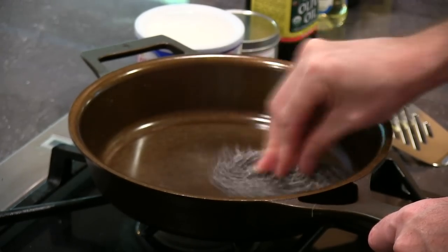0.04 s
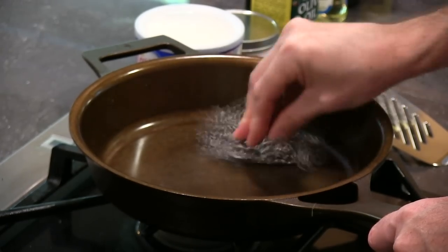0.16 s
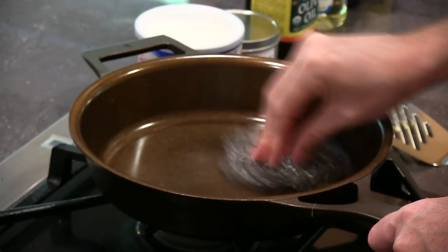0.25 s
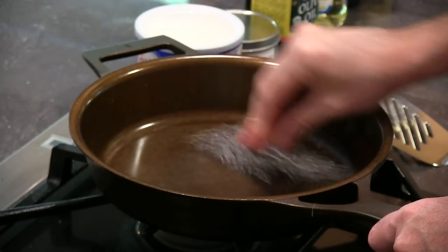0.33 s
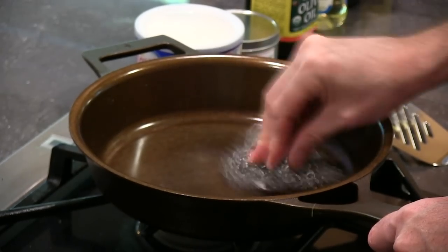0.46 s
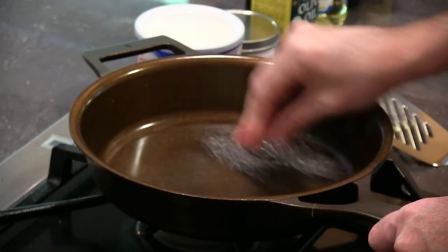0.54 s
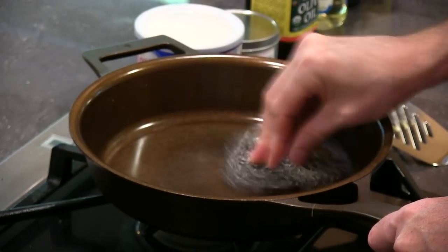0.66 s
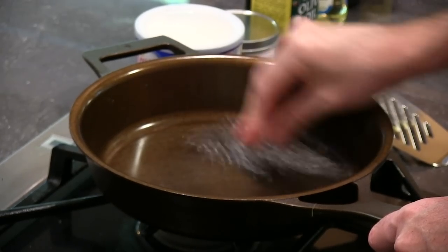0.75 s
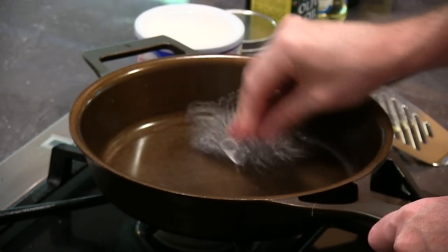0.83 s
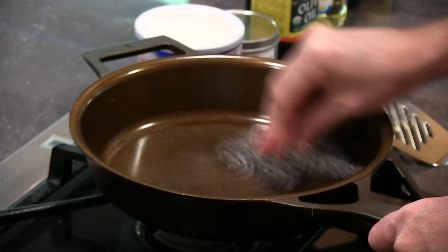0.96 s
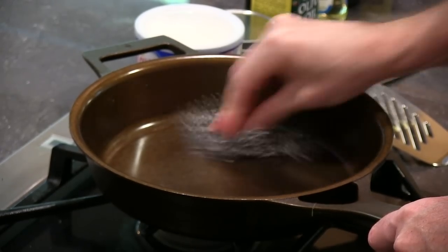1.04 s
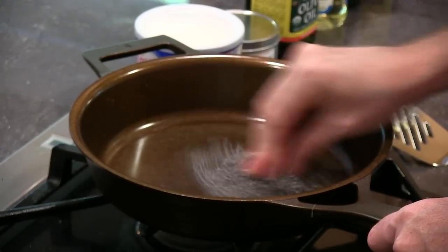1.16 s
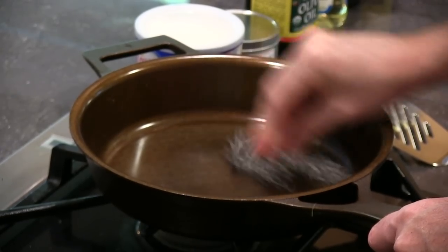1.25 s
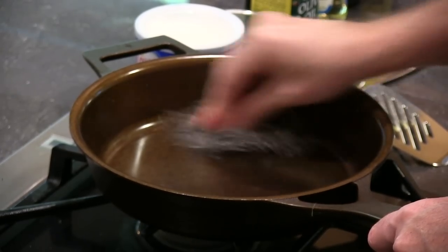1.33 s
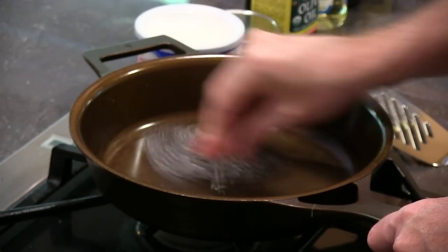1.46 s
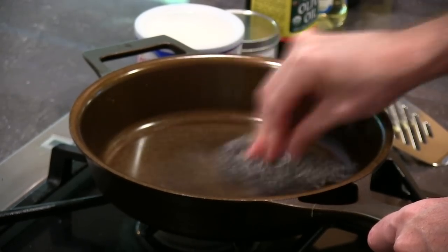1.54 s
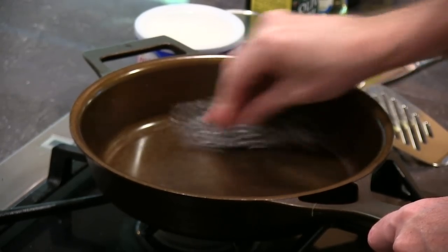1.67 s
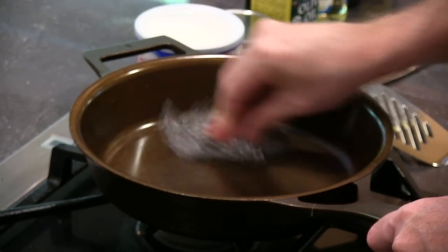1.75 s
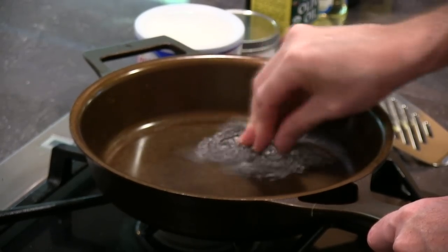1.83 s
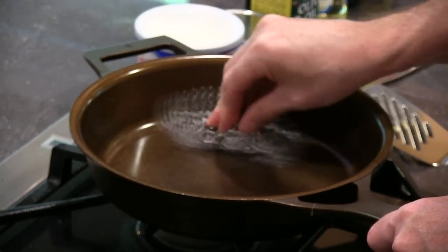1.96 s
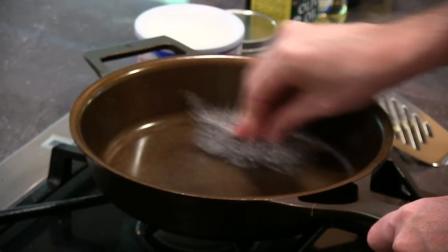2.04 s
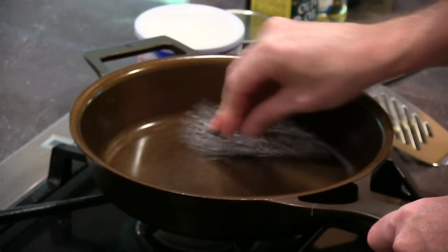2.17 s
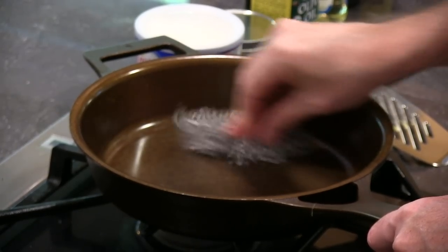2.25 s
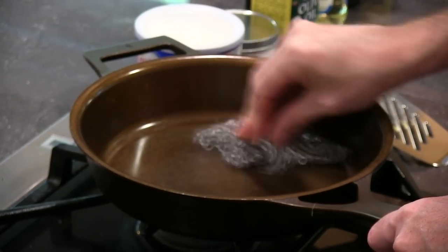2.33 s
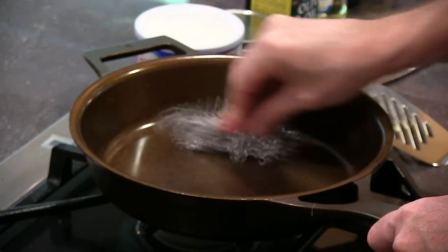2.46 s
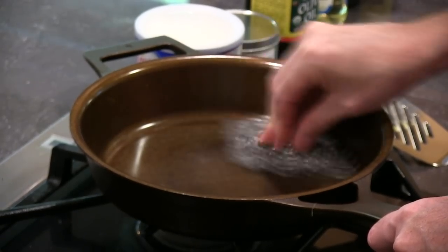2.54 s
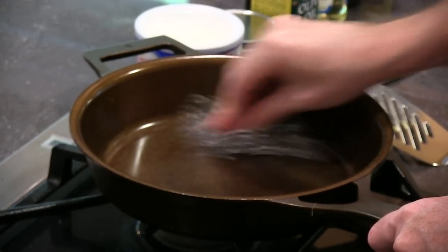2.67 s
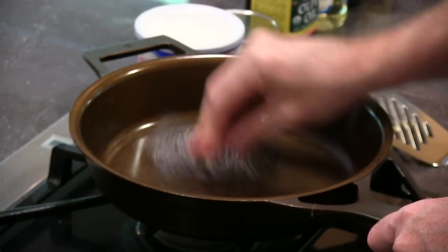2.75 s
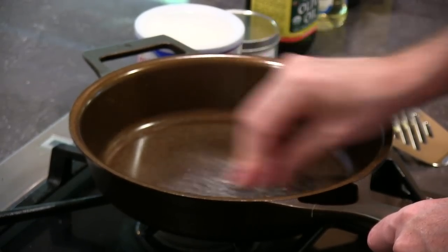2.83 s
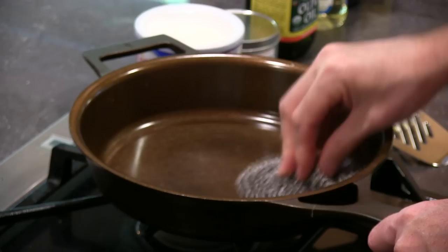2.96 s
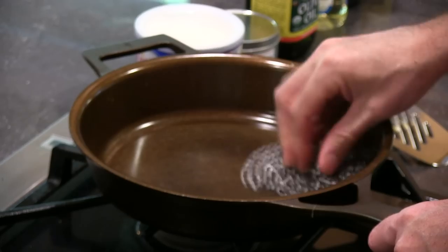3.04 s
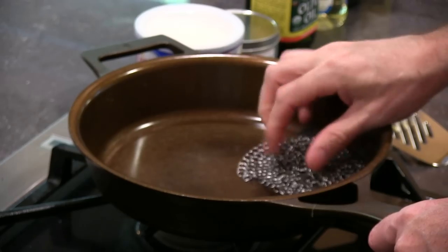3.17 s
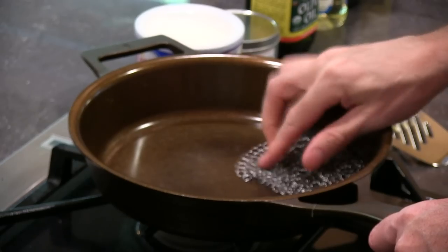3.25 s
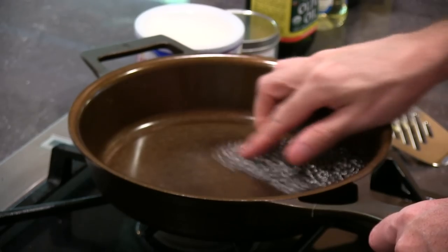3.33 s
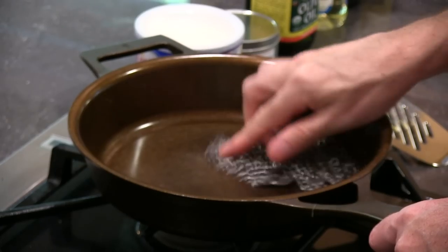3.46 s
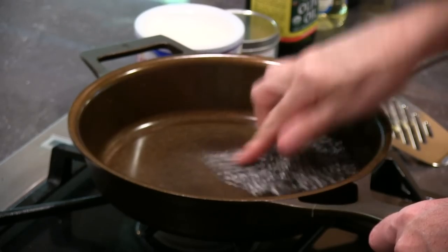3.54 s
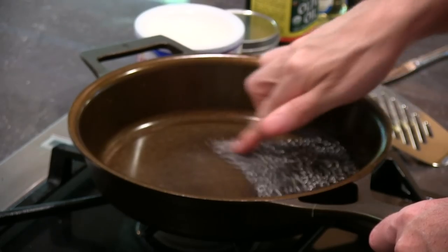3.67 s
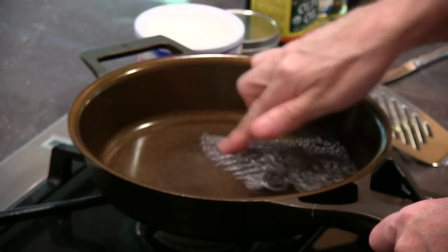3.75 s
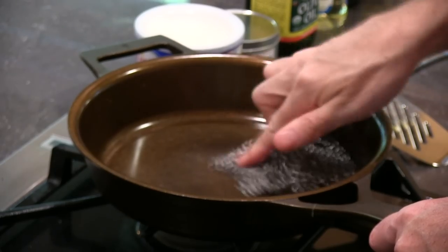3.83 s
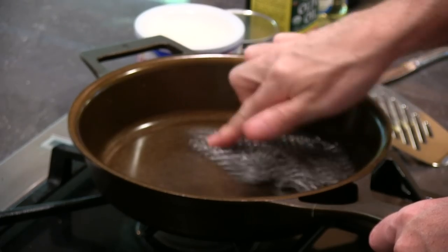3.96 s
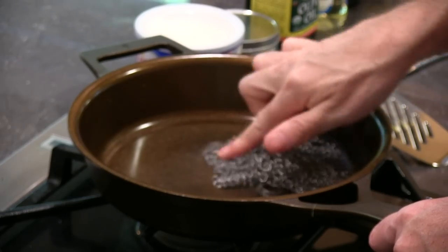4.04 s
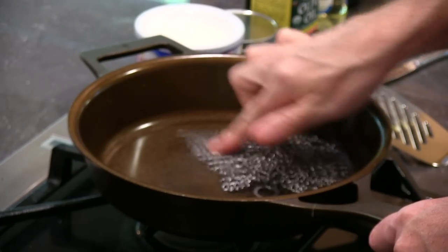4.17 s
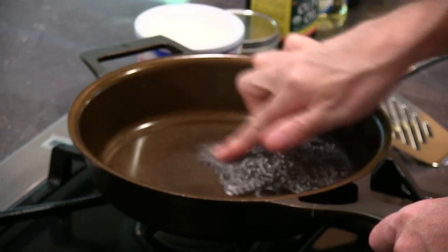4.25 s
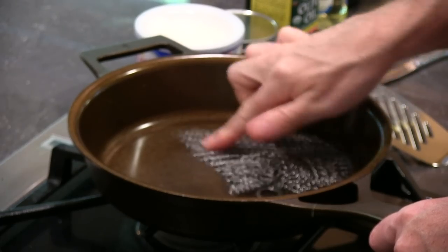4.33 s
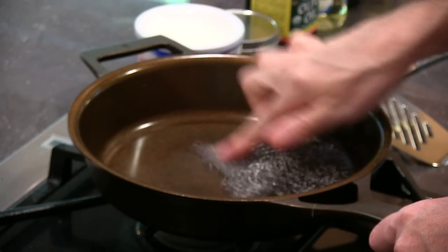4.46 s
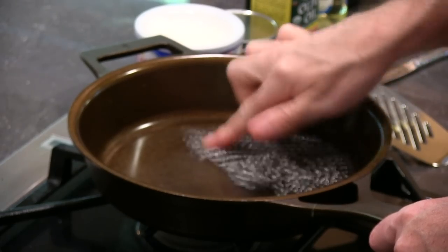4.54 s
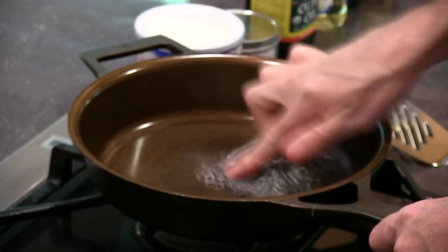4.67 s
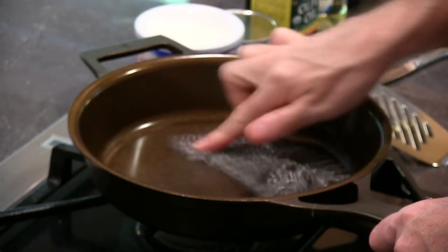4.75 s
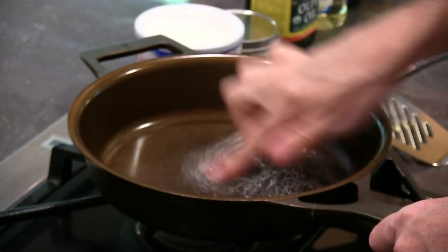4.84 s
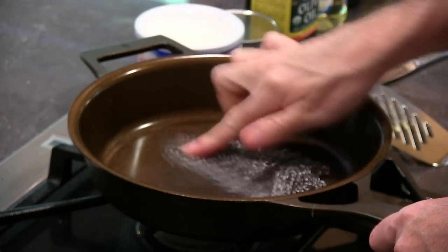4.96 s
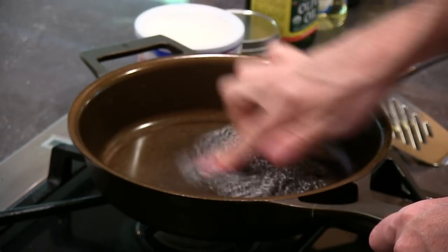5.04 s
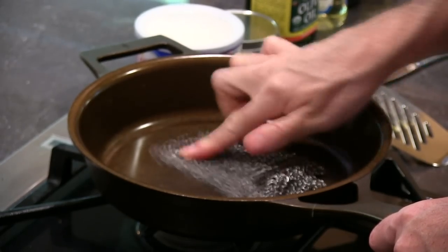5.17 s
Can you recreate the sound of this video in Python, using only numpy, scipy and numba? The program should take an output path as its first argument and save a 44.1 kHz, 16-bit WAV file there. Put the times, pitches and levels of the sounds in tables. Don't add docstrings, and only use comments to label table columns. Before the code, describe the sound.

Bright, gritty metal-on-metal scrubbing runs in fast back-and-forth strokes, pan tones ringing under sizzling link jingle. It swells just before three seconds, cuts out briefly amid a cluster of low grate knocks, lands again and continues softer and choppy, then grows strong near the end. Close mono microphone, small dry kitchen, faint hum and room air.

```python
import sys
import numpy as np
from scipy import signal
from scipy.fft import rfft, irfft
from scipy.io import wavfile
from scipy.ndimage import uniform_filter1d
from numba import njit

SR = 44100
rng = np.random.default_rng(int(sys.argv[2]) if len(sys.argv) > 2 else 0)


def log_audio(samples):
    frames = np.atleast_2d(samples).T
    limited = np.clip(frames, -1, 1)
    pcm = np.round(limited * 32767).astype(np.int16)
    wavfile.write(sys.argv[1], SR, pcm)


def makeup_ratio(level_db):
    decades = np.asarray(level_db, float) / 20
    return 10 ** decades


N = 229578

# (frequency [Hz], density [dB per Hz])
KITCHEN_AIR = [(60, -9.5), (130, -1), (200, -17), (350, -13.5), (700, -8.5), (1500, -11), (4000, -16),
               (8000, -35), (16000, -51)]
# (time [s], drag [dB], finger weight on the pan floor [dB])
HAND = [(0, -28.5, -1.5), (.3, -28.5, -1.5), (.58, -28, -1), (1.1, -28, -1), (1.5, -28.5, -2.5),
        (1.7, -32, -1), (2.0, -31.5, -1.5), (2.2, -33.5, 1.5), (2.6, -29, -1.5), (2.8, -25.5, -6.5),
        (3.04, -49, 1.5), (3.16, -37, 5.5), (3.4, -36.5, 1.5), (3.62, -38, 4.5), (3.8, -32.5, 5),
        (4.1, -35, 1.5), (4.62, -28, 0.5), (5.21, -29.5, -1.5)]
# (time [s], depth [dB], half length [s])
STALLS = [(0.106, 1, .008), (0.243, 1, 0.021), (0.466, 0, .03), (0.752, 1, .015), (1.003, 1.5, 0.017),
          (1.3, 2, 0.03), (1.77, -0.5, 0.015), (2.095, 1.5, 0.024), (3.032, 11, 0.009), (3.2, 12, 0.028),
          (3.324, 4.5, 0.023), (3.521, 8, 0.032), (3.65, 4.5, 0.014), (3.74, 1.5, .015), (3.96, 6.5, 0.019),
          (4.05, 5, 0.018), (4.153, 3, 0.024), (4.245, 8.5, 0.018), (4.343, 5.5, .02), (4.457, 1.5, .02),
          (5.006, 8, 0.0065)]
# (time [s], extra weight [dB], half length [s])
DIGS = [(.22, 4.5, 0.051), (.41, 3, 0.022), (.62, 4.5, 0.019), (.8, 4, 0.024), (.86, 6.5, 0.015),
        (.92, -5, 0.037), (1.17, 3, 0.047), (1.41, 2.5, .03), (1.55, -4, .05), (1.72, 5, 0.027),
        (1.99, 2, 0.037), (2.51, -5.5, 0.022), (2.62, 4, .04), (3.4, 2, .04), (3.6, 2.5, 0.033),
        (3.83, 1, 0.024), (3.93, 5, .015), (4.02, 1.5, 0.024), (4.31, 4, 0.016), (4.41, 3, .02),
        (4.64, 2.5, 0.076)]
# (time [s], peak [dB], fade [s])
SURGES = [(0.1121, -5, 0.024), (0.1421, -3, 0.045), (0.252, -6, 0.05), (0.3486, -5.5, 0.03),
          (0.4045, -4, 0.02), (0.4918, -3.5, 0.041), (0.5531, -4, 0.035), (0.6055, -11, 0.023),
          (0.7, -12, 0.024), (0.78, -4, 0.072), (0.8859, -3.5, 0.023), (0.9692, -17, 0.023),
          (1.0106, -3.5, 0.049), (1.0814, -4, 0.058), (1.2106, -11, 0.062), (1.3204, -26, 0.021),
          (1.529, -3.5, 0.053), (1.8103, -8.5, 0.032), (1.938, -16, 0.03), (2.5316, -10.5, 0.15),
          (3.161, -5, 0.016), (3.68, -9.5, 0.063), (3.7928, -6.5, 0.03), (4.19, -13, 0.03),
          (4.361, -11.5, 0.044), (4.487, -4.5, 0.013), (4.5984, -1.5, 0.049), (4.657, -2, 0.053),
          (4.7366, -7, 0.014), (4.9122, -9, 0.021)]
# (frequency [Hz], width [Hz], level [dB])
FLOOR_MODES = [(553, 55, -5.5), (574, 49, -17), (678, 30, -8.5), (781, 69, -9.5), (1047.5, 20, 3.5),
               (1060, 21.6, 1), (1134, 24, -3.5), (1220, 105, -8.5), (1593, 12.8, 0), (1668, 58, -4.5)]
# (frequency [Hz], width [Hz], level [dB])
WALL_MODES = [(1953, 63, -13.5), (2377, 17, -23.5), (2356, 36, -10.5), (2807, 58, -5.5), (3297, 46, -6.5),
              (3533, 39, -10.5), (4044, 69, -5), (4340, 29, -12.5), (4613, 52, -7), (4740, 63, -7),
              (5040, 33, -13), (5390, 157, -13)]
# (frequency [Hz], width [Hz], level [dB])
RIM_MODES = [(6140, 56, -5), (6500, 48, 0), (7260, 51, 0), (7510, 120, -3), (8170, 97, -1), (9070, 170, -2),
             (9840, 54, -3)]
# (frequency [Hz], width [Hz], level [dB])
LINK_MODES = [(10800, 78, -2), (11300, 260, 0), (12000, 42, -2), (12700, 150, -1), (13500, 35, -4),
              (14000, 65, -3), (14400, 140, 0), (15200, 150, -2), (15600, 64, -4)]
# (frequency [Hz], density [dB per Hz])
SMALL_MODES = [(300, -57), (480, -14.5), (800, -13), (940, -52.5), (1300, -6), (2100, -7.5), (3700, -7.5),
               (5700, -3.5), (6300, 0.5), (10000, 0.5), (12500, 0.5), (16000, -5)]
# (time [s], peak [dB])
THUMPS = [
    (0.109, -40),
    (0.527, -44),
    (1.008, -42),
    (3.16, -37),
    (5.021, -42),
]
# (time [s], peak [dB], boom re peak
# [dB], tick re peak [dB])
KNOCKS = [(1.066, -29.5, -25, 7), (1.668, -30, -16, -23), (2.667, -28.5, -1.5, -14), (2.705, -36, -3, -17),
          (2.896, -42, -0.5, -18), (3.043, -34.5, 3, 4), (3.053, -38.5, 10, -25), (3.067, -30.5, -5, -2),
          (3.088, -32, -7, -28), (3.165, -38, -17, -20), (3.251, -39, 2, -15), (3.27, -28, -6.5, -10.5),
          (3.764, -41, -13, 8), (4.399, -29, -10, -10), (4.495, -30.5, -7, -10)]
# (frequency [Hz], width [Hz], level [dB])
GRATE_MODES = [(127, 17.5, 3), (189, 48, -5), (252, 75, -6.5), (404, 45, -4.5), (551, 39, -3),
               (639, 28, 2.5), (780, 58, -12)]

HUM_HZ, HUM_DB, AIR_DB = 53.3, -54, -52.5
FLOOR_DB, FLOOR_SLOPE, WALL_DB, WALL_SLOPE = -39, 0.77, -38.5, 1
RIM_DB, LINK_DB, LINK_SLOPE = -33.5, -32.5, 1.04
LIFT_S, LAND_S, SETTLE_S, TOUCH_S = 3.03, 3.152, 0.034, 0.0013
CREEP_DB, WOBBLE_DB, WOBBLE_S = -60.5, -11.5, 0.062
TOP_HZ = 15730


def unit(x):
    return x / np.sqrt(np.mean(x ** 2))


def band(x, lo_hz, hi_hz, order=4):
    return signal.sosfilt(signal.butter(order, [lo_hz, hi_hz], "band", fs=SR, output="sos"), x)


def colour(x, points):
    hz, db = np.transpose(points)
    log_f = np.log(np.arange(len(x) // 2 + 1) * SR / len(x) + 1)
    return irfft(rfft(x) * makeup_ratio(np.interp(log_f, np.log(hz), db)), len(x))


def walks(rate_hz, count):
    k = max(int(SR / rate_hz / 256), 1)
    steps = rng.standard_normal((count, N // 256 + 2))
    smooth = uniform_filter1d(uniform_filter1d(steps, k), k)
    return smooth / smooth.std()


def kitchen():
    t = np.arange(N) / SR
    drift = np.repeat(walks(4.4, count=2), 256, axis=1)[:, :N]
    phase = 2 * np.pi * HUM_HZ * t + 0.55 * uniform_filter1d(drift[1], 512)
    hum = makeup_ratio(HUM_DB + 3 + 0.9 * drift[0]) * np.sin(phase)
    rumble = makeup_ratio(-54.5) * unit(band(rng.standard_normal(N), 17.0, 47, order=2))
    air = makeup_ratio(AIR_DB) * unit(colour(rng.standard_normal(N), KITCHEN_AIR))
    return hum + rumble + air


@njit
def ring(force, hz, width_hz, gain):
    out = np.zeros(force.shape[1])
    for m in range(len(hz)):
        pole = np.exp((2j * np.pi * hz[m] - np.pi * width_hz[m]) / SR)
        z, x, norm = 0j, force[m % force.shape[0]], 1 - abs(pole)
        for i in range(len(out)):
            a = (i & 255) / 256
            g = (1 - a) * gain[m, i >> 8] + a * gain[m, (i >> 8) + 1]
            z = z * pole + x[i] * g
            out[i] += norm * z.imag
    return out


def modes(force, table, wander_db, rate_hz):
    hz, width_hz, db = np.array(table, float).T
    gain = makeup_ratio(db[:, None] + wander_db * walks(rate_hz, len(hz)))
    return ring(force + 1e-18, hz.copy(), width_hz.copy(), gain)


def crowd(force, lo_hz, hi_hz, width_hz, wander_db, count):
    chance = rng.random((count, 3))
    hz = lo_hz + (hi_hz - lo_hz) * (np.arange(count) + chance[:, 0]) / count
    table = np.c_[hz, width_hz * (0.4 + chance[:, 1]), 6 * chance[:, 2]]
    return unit(colour(modes(force, table, wander_db, 4.6), SMALL_MODES))


def ticks(per_s, spread_db, cap_db, count=4):
    chance = rng.random((3, count, N))
    level_db = np.minimum(-spread_db * np.log(1 - chance[1]), cap_db)
    size = makeup_ratio(level_db) * np.sign(chance[2] - 0.5)
    return unit((chance[0] < per_s / SR) * size)


def course(rows):
    time_s, *columns = np.transpose(rows)
    return [np.interp(np.arange(N) / SR, time_s, c) for c in columns]


def bumps(rows):
    t = np.arange(N) / SR
    return sum(height * np.exp(-((t - s) / half_s) ** 2) for s, height, half_s in rows)


def drag():
    drag_db, weight_db = course(HAND)
    return drag_db - bumps(STALLS), weight_db + bumps(DIGS)


def surges():
    t, power = np.arange(N) / SR, np.zeros(N)
    for s, db, fade_s in SURGES:
        u = np.clip(t - s + 0.0059, 0, None)
        jump = (1 - np.exp(-u / 0.001)) * np.exp(-u / max(fade_s, 0.004))
        power += (makeup_ratio(db - 20.5) * jump) ** 2
    return power


def pressure(drag_db, rest_db, surge):
    t = np.arange(N) / SR
    lift = np.exp(-np.clip(t - LIFT_S, 0, None) / SETTLE_S)
    land = 1 - np.exp(-(np.clip(t - LAND_S, 0, None) / TOUCH_S) ** 2)
    flutter = np.repeat(walks(35, count=1)[0], 256)[:N]
    power = makeup_ratio(drag_db + 0.71 * flutter) ** 2 + makeup_ratio(rest_db) ** 2 + surge
    return np.maximum(lift, land) * np.sqrt(power)


def scrub():
    drag_db, weight_db = drag()
    floor_db = FLOOR_DB + FLOOR_SLOPE * (drag_db + 30.5) + weight_db
    wall_db = WALL_DB + WALL_SLOPE * (drag_db + 30) + 0.43 * weight_db
    rim_db = RIM_DB + drag_db + 29.5
    link_db = LINK_DB + LINK_SLOPE * (drag_db + 30.5)
    surge, hits, out = surges(), ticks(5000, 3.0, 12.9), 0
    # width Hz, level dB, count
    parts = [(FLOOR_MODES, floor_db, -49, -16, 480, 1800, 60, -11, 16),
             (WALL_MODES, wall_db, -50, -11, 1800, 6000, 60, -4, 40),
             (RIM_MODES, rim_db, -51, -3, 6000, 10400, 85, 1.5, 58),
             (LINK_MODES, link_db, -57, -2.5, 10400, 15900, 85, 1.5, 72)]
    for table, db, rest_db, surge_db, lo_hz, hi_hz, width_hz, crowd_db, count in parts:
        force = hits * pressure(db, rest_db, surge * makeup_ratio(surge_db) ** 2)
        named = unit(modes(force, table, 2.58, 12.5))
        small = makeup_ratio(crowd_db) * crowd(force, lo_hz, hi_hz, width_hz, 3.7, count)
        contact = unit(band(colour(force[0], SMALL_MODES), lo_hz, hi_hz, order=2))
        body = unit(named + small) + makeup_ratio(-16.5) * contact
        out = out + unit(body) * np.sqrt(np.mean(force ** 2))
    return band(out, 511, 17000, order=9)


def shuffle():
    t, power = np.arange(N) / SR, makeup_ratio(CREEP_DB) ** 2
    for s, db, boom_db, _ in KNOCKS:
        wobble = makeup_ratio(db + boom_db + WOBBLE_DB) * np.exp(-np.abs(t - s) / WOBBLE_S)
        power = power + (t > s) * wobble ** 2
    return np.sqrt(power) * unit(modes(rng.standard_normal((1, N)), GRATE_MODES[:4], 2.9, 14))


def thumps():
    t, out = np.arange(N) / SR, np.zeros(N)
    for s, db in THUMPS:
        u = np.clip(t - s, 0, None)
        out += makeup_ratio(db + 7.5) * np.sin(2 * np.pi * 36 * u) * np.exp(-u / 0.022)
    return out


def knocks():
    u = np.arange(800) / SR
    push = (1 - np.exp(-u / 0.001)) * np.exp(-u / 0.0029)
    force = np.zeros((3, N))
    for s, db, boom_db, tick_db in KNOCKS:
        i, grit = int(s * SR), rng.standard_normal((2, 800))
        force[0, i:i + 800] += makeup_ratio(db + boom_db) * push * (1 - np.exp(-u / 0.0029))
        force[1, i:i + 800] += makeup_ratio(db) * push * grit[0]
        force[2, i:i + 800] += makeup_ratio(db + tick_db) * push * grit[1]
    boom = makeup_ratio(14) * modes(force[:1], GRATE_MODES[:4], 2.0, 22)
    clank = makeup_ratio(33.0) * band(modes(force[1:2], GRATE_MODES[4:], 0.47, 12), 436, 9000)
    ping = makeup_ratio(20) * modes(force[2:], WALL_MODES, 4.3, 30)
    scrape = makeup_ratio(5) * band(force[2], 900, 4500, order=2)
    return boom + clank + ping + scrape


def room_tail(near):
    t = np.arange(SR // 3) / SR
    tail = rng.standard_normal(len(t)) * np.exp(-t * np.log(1000) / 0.32) * (t > 0.004)
    response = band(tail, 130, 5200, order=1) / np.sqrt(np.sum(tail ** 2))
    return makeup_ratio(-20.5) * signal.fftconvolve(near, response)[:N]


def scene():
    near = scrub() + shuffle() + knocks()
    return np.tile(near + room_tail(near) + thumps() + kitchen(), (2, 1))


def low_pass(x):
    return signal.sosfilt(signal.butter(12, 16730, fs=SR, output="sos"), x)


def record(dry):
    passed = np.arange(N // 2 + 1) * SR / N < TOP_HZ
    mix = irfft(rfft(dry) * passed, N)
    return low_pass(mix)


dry = scene()
out = record(dry)
log_audio(out)
```